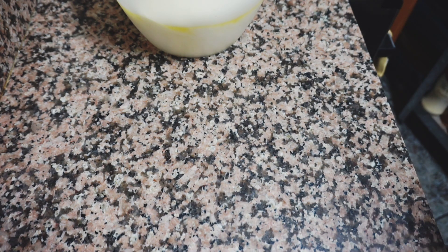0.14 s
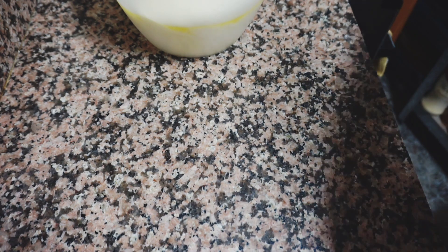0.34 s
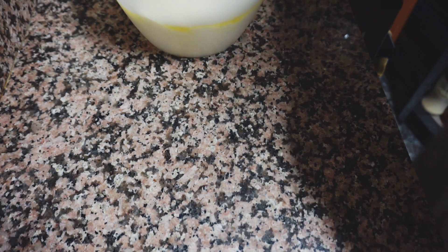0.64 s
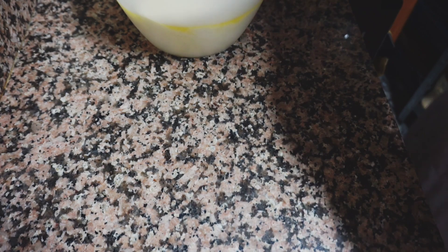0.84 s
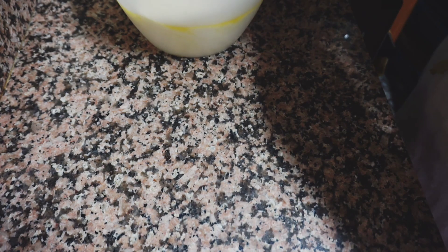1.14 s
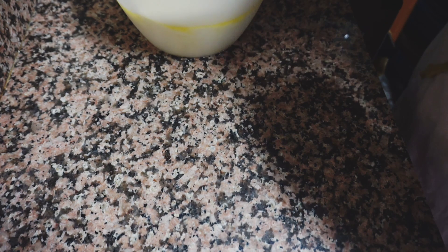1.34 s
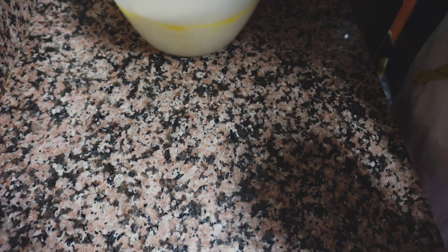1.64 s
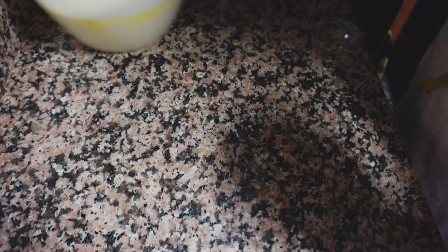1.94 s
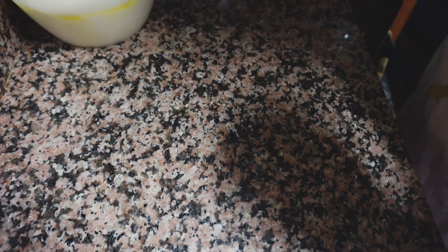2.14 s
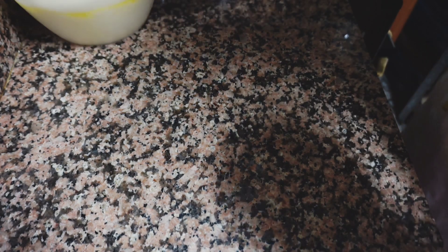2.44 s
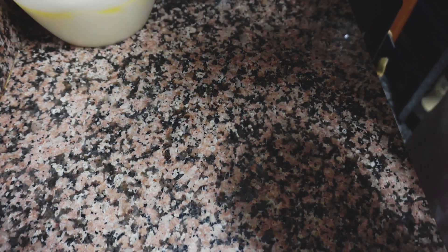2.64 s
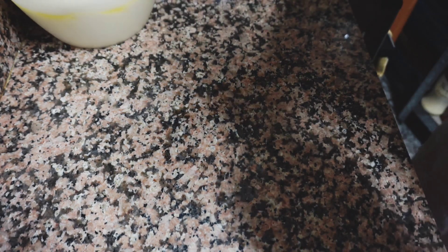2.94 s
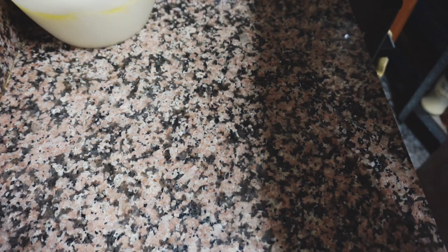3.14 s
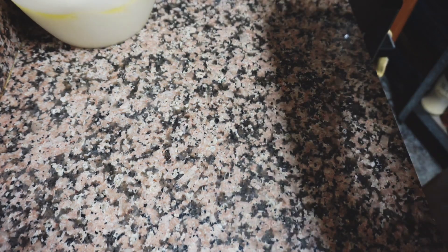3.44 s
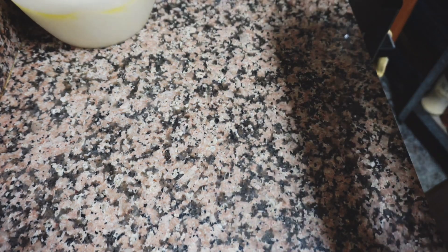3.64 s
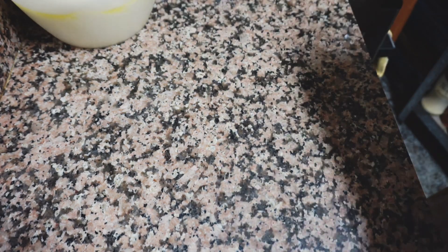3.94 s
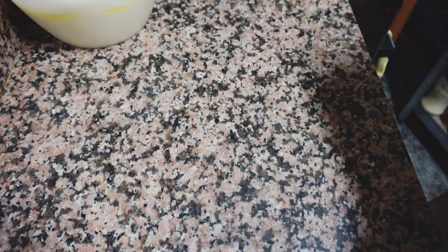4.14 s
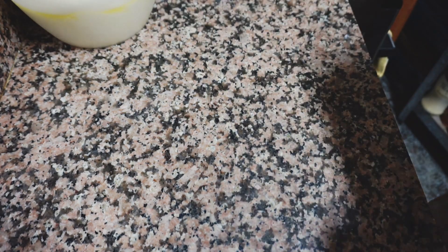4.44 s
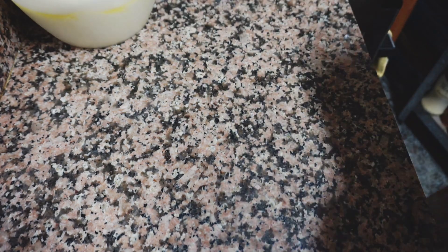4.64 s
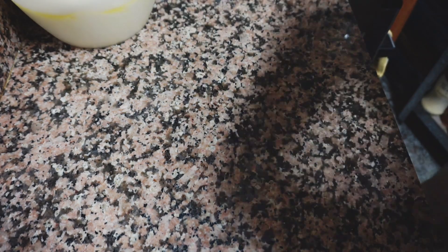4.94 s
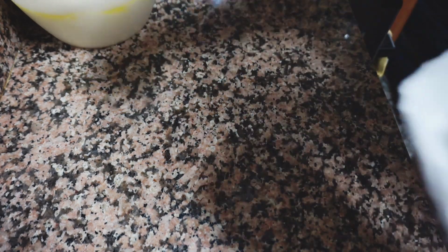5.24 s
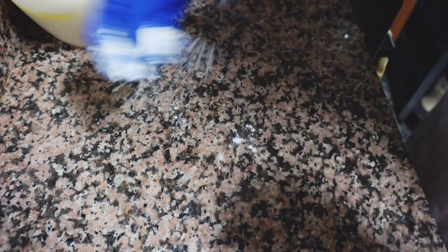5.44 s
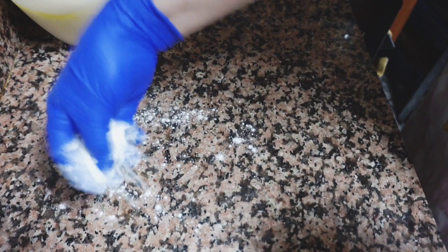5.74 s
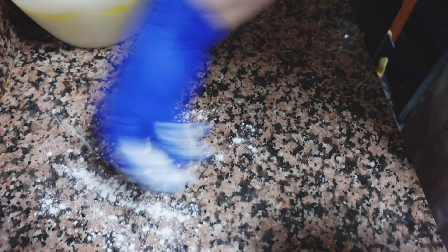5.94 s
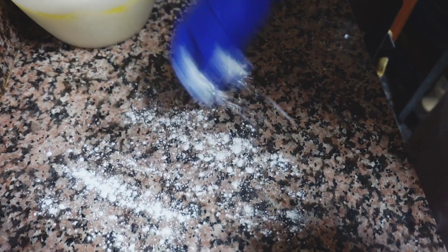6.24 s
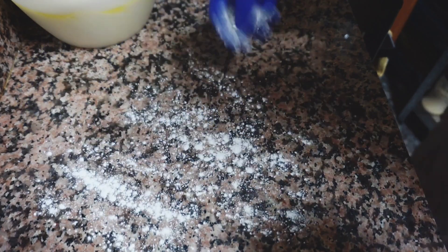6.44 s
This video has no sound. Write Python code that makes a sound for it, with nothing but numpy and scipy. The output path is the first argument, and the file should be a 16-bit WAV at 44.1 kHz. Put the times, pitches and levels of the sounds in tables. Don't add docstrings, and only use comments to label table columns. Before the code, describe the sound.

Close stereo pickup in a hard-walled kitchen. From the very start to about 1.4 s a gloved hand rummages in a flour bag: abrupt, dry crackles and papery snaps, densest and loudest around 0.7-1.2 s, with scratchy scraping and soft powdery hiss. From 1.5 to 2.1 s a plastic bowl is pushed over stone, a hollow, grating chatter that swells near 1.9 s with small catches; at 2.15 s it is knocked once, short and hard. A quicker, higher scrape follows at 2.4-2.65 s, then a barely audible slip. From about 3.0 to 5.1 s the bag rustles again in separate grabs and strokes, with sharp snaps near 3.26 and 4.8 s. Afterwards it is quiet: a faint clock ticks and tocks roughly every quarter second, soft dull taps come at 5.8-5.9 s, and faint air noise, fluctuating distant machine hum and a very high, thin whistle remain until 6.6 s.

```python
import sys
import numpy as np
from scipy import signal
from scipy.fft import rfft, irfft
from scipy.io import wavfile
from scipy.ndimage import uniform_filter1d

SR = 44100
rng = np.random.default_rng(int(sys.argv[2]) if len(sys.argv) > 2 else 0)


def linear_from_db(decibels):
    return 10 ** (np.asarray(decibels, float) / 20)


def bounce(signal):
    frames = np.transpose(np.atleast_2d(signal))
    limited = np.clip(frames, -1, 1)
    pcm = np.round(limited * 32767).astype(np.int16)
    wavfile.write(sys.argv[1], SR, pcm)


N = 290178
T = np.arange(N) / SR

# (time [s], peak level [dB], ring frequency [Hz], burst length [s])
BAG_CREASES = [(0.0005, -13, 1210, 0.0039), (0.01, -15.5, 1450, 0.004), (0.02, -19, 900, 0.0037),
               (0.0527, -20, 1490, 0.003), (0.1, -25.5, 700, 0.0044), (0.241, -21, 960, 0.004),
               (0.282, -28, 1200, 0.0022), (0.319, -27.5, 905, 0.004), (0.452, -31, 1880, 0.0066),
               (0.495, -39, 383, 0.01), (0.491, -15.5, 1500, 0.004), (0.516, -17.5, 1100, .003),
               (0.542, -22, 1000, 0.0038), (0.554, -12.5, 1390, 0.0035), (0.671, -26.5, 930, 0.013),
               (0.688, -13, 1180, 0.0024), (0.702, -13.5, 880, 0.0078), (0.708, -17, 1000, 0.0022),
               (0.714, -26, 790, 0.0042), (0.734, -19, 670, 0.0089), (0.741, -14.5, 860, 0.0032),
               (0.761, -9.5, 1090, 0.0028), (0.771, -20.5, 800, 0.0025), (0.783, -20, 850, 0.011),
               (0.818, -21.5, 1190, 0.004), (0.822, -14, 995, 0.003), (0.8295, -8, 950, 0.003),
               (0.863, -29, 899, 0.0048), (0.933, -18, 870, 0.0074), (1.003, -14.5, 1190, 0.0054),
               (1.059, -23, 890, 0.003), (1.068, -16, 1010, 0.0026), (1.073, -12.5, 1120, 0.003),
               (1.095, -13, 930, 0.0011), (1.097, -17, 700, 0.004), (1.116, -22.5, 426, 0.0063),
               (1.124, -18, 830, 0.011), (1.179, -25, 950, 0.0075), (1.146, -22, 620, 0.0052),
               (1.169, -21, 960, 0.003), (1.26, -17, 970, 0.0011), (1.269, -17.5, 785, 0.0031),
               (1.348, -22, 3250, 0.0036),
               (3.074, -30.5, 684, 0.01), (3.163, -23, 680, 0.0019), (3.215, -18, 646, 0.0087),
                (3.229, -16.5, 835, 0.0057), (3.244, -25, 535, 0.016), (3.26, -23.5, 573, 0.0065),
                (3.434, -22.5, 2160, 0.0085), (3.483, -18, 776, 0.0024), (3.507, -16.5, 824, 0.0031),
                (3.513, -17, 1020, 0.0035), (3.52, -15.5, 940, 0.0027), (3.525, -22, 960, 0.0017),
                (3.584, -23, 840, 0.027), (3.623, -21, 900, 0.0034), (3.629, -16.5, 1900, 0.004),
                (3.721, -28, 700, 0.003), (3.727, -19, 1150, 0.0092), (3.744, -18.5, 754, 0.0024),
                (3.758, -16.5, 805, 0.0042), (3.776, -25, 778, 0.0018), (3.787, -11.5, 1050, 0.005),
                (3.912, -20.5, 855, 0.013), (3.943, -17.5, 1020, 0.0049), (3.951, -19.5, 910, 0.003),
                (3.974, -18.5, 1290, 0.0073), (4.006, -14, 1040, 0.0025), (4.128, -24.5, 910, 0.0067),
                (4.253, -18.5, 1090, 0.0044), (4.273, -23, 786, 0.0061), (4.468, -26.5, 930, 0.0026),
                (4.536, -18.5, 1480, 0.0072), (4.795, -17, 1120, 0.0039), (4.802, -19, 905, .003),
                (4.837, -23.5, 620, 0.0051), (4.927, -24.5, 850, 0.0028), (5.045, -20.5, 1050, 0.0041)]
# (time [s], peak level [dB], ring frequency [Hz])
THIN_FOLDS = [(0.314, -19, 1920), (0.32, -25, 3900), (.784, -15.5, 3460), (1.297, -19, 3930),
              (1.353, -23, 3160), (1.345, -27, 2700), (1.357, -45, 3260), (1.305, -34, 3900),
              (1.315, -33, 4000), (3.027, -44.5, 656), (3.075, -31, 3700), (3.162, -29, 2670),
              (3.2612, -9, 2100), (3.507, -22, 1940), (4.0024, -21, 2100), (4.706, -42, 1460),
              (4.736, -32.5, 720), (4.8015, -10, 2420), (4.8364, -26, 3700), (4.99, -28.5, 516),
              (5.06, -35, 446), (5.085, -45, 323), (0.881, -36, 278), (1.129, -41, 2480), (4.5, -46, 800),
              (0.049, -16, 2610), (.7078, -23, 2750), (0.723, -7, 3730), (.738, -14, 2500),
              (.822, -9.5, 3470), (1.0595, -24, 2920), (1.068, -18, 2850), (1.1263, -13, 2390),
              (1.158, -19, 3700), (1.182, -17, 3000), (3.513, -25.5, 3800), (3.526, -16, 2500),
              (3.5837, -21, 3000), (3.6239, -37, 2710), (4.4997, -21, 4560)]
# (frequency [Hz], width [Hz], level [dB])
BAG_RESONANCES = [(595, 61, 2.5), (778, 360, 8.5), (1050, 260, 3), (1480, 71, 11), (269, 110, -3.5)]
# (frequency [Hz], level per Hz [dB])
SCRAPE_SPECTRUM = [(1200, 1.5), (1700, 2.5), (2300, 6.5), (3000, 2), (4800, -1), (6000, -14), (8000, -11)]
FLOUR_SPECTRUM = [(3500, 0), (5500, -1), (7900, -0.5), (10000, 1), (13000, -1), (15500, -5), (17000, -47)]
# (start [s], hold [s], flour level [dB], grip on the wall over the flour [dB])
HAND_STROKES = [(0.191, 0.14, -43, -1.5), (0.32, 0.092, -52.5, 6), (0.467, 0.041, -37, -2.5),
                (0.62, 0.043, -40.5, -3.5), (1.165, 0.03, -35, 0.5), (1.224, 0.094, -41, -0.5),
                (1.392, 0.089, -64, -2.5), (2.98, 0.098, -67, -11), (3.224, 0.034, -32, -4.5),
                (3.398, 0.077, -42.5, 1), (3.59, 0.088, -38.5, 1), (3.683, 0.042, -38.5, -3.5),
                (3.852, 0.13, -31.5, -3.5), (4.099, 0.04, -48.5, 5), (4.195, 0.055, -45, 2.5),
                (4.302, 0.098, -45, 0), (4.468, 0.08, -43.5, 1.5), (4.671, 0.17, -39.5, -3),
                (4.873, 0.12, -33.5, -10), (5.014, 0.03, -34, -4)]
HAND_GRABS = [(0, 0.017, -42, 13.5), (.05, 0.016, -46.5, 14), (0.491, 0.017, -37.5, 6),
              (.55, 0.027, -40.5, 5.5), (.536, .003, -40, -4), (.61, .004, -37.5, -6),
              (.636, 0.011, -36, -3), (0.684, 0.008, -49.5, 21), (.707, 0.005, -36.5, 11.5),
              (0.725, .008, -46, 10), (.737, 0.0058, -41, 15), (0.7848, 0.0043, -38.5, 10.5),
              (0.822, 0.0063, -36, 7), (.86, 0.087, -53, 7), (0.934, 0.052, -40, 1),
              (1.001, 0.063, -45.5, 7), (1.06, 0.026, -50, 20.5), (1.09, .06, -53, 17.5),
              (1.341, 0.012, -56, 0), (3.072, 0.054, -43, -2.5), (3.164, 0.005, -46, 14.5),
              (3.485, 0.031, -40.5, 5), (3.505, 0.018, -31.5, 2), (3.623, 0.0043, -28, -8.5),
              (3.74, 0.099, -35, 0), (4.001, 0.024, -36, 3), (4.534, 0.056, -46.5, 0.5),
              (4.793, 0.073, -37.5, -2)]
STROKE_RISE_DB_S, GRAB_RISE_DB_S, FALL_DB_S = 270, 2990.5, 507
# (time [s], delay of the left port [samples], left minus right level [dB])
HAND_PLACE = [
    (0, 7, -2.5),
    (.4, -6, -3.5),
    (1.4, -6, -5),
    (1.5, -1, 2.5),
    (3, -1, 2.5),
    (3.02, 8, -3),
    (6.6, 8, -3.5),
]

# (time [s], level [dB])
FOOT_PRESSURE = [
    [(1.52, -71), (1.61, -54.5), (1.63, -49), (1.75, -40), (1.89, -36.5), (1.95, -39), (2.04, -44),
     (2.135, -48)],
    [(2.33, -78), (2.385, -62.5), (2.49, -45), (2.575, -42), (2.62, -53), (2.68, -66), (2.76, -73)],
    [(2.8, -93), (2.86, -85), (2.93, -87), (2.99, -129.5)],
]
RIM_LEVELS = [-7, 3, 19]
GRIT_LEVELS = [-57, -64, -64]
# (frequency [Hz], width [Hz], level [dB])
BOWL_RESONANCES = [(157.5, 9.3, -3.5), (339, 82, -4.5), (570, 40, 0.5), (670, 270, -1.5), (800, 39, -7)]
SLOW_RIM = [(1350, 1100, 20.5), (1810, 450, 18), (2100, 110, 22), (2280, 160, -5), (3700, 220, -9)]
QUICK_RIM = [(1120, 540, 4.5), (1910, 320, 9), (2170, 470, 14.5), (2720, 190, 11.5), (3430, 170, 15),
             (4160, 440, 7), (4800, 560, 2.5), (6000, 410, -0.5)]
# (time [s], hold [s], level [dB])
GRIT_SCUFFS = [
    (1.535, .01, -63),
    (1.563, 0.009, -59),
    (1.637, 0.011, -49),
    (1.698, .005, -56),
    (2.052, 0.0081, -58),
    (2.59, 0.013, -53.5),
    (2.93, 0.007, -60),
]
# (time [s], level [dB])
FOOT_CATCHES = [
    (1.701, -42),
    (1.749, -61),
    (1.819, -32),
    (1.874, -25),
    (1.889, -35),
    (1.904, -34),
    (1.953, -27.5),
    (2.047, -27.5),
    (2.577, -33),
]
# (time [s], level [dB])
KNOCK_CONTACTS = [
    (2.1442, -25.5),
    (2.1465, -23.5),
    (2.1478, -12),
    (2.151, -29),
]
# (frequency [Hz], level [dB], decay time T60 [s])
CATCH_MODES = [(574, -1.5, 0.05), (660, -3, 0.054), (830, 3.5, 0.052), (2000, 0, 0.0072)]
BOWL_MODES = [(620, -19, 0.008), (830, -5.5, 0.029), (1190, -3, 0.013), (2044, 3, 0.032), (2420, 8, 0.0057),
              (2610, 6, 0.0122), (3400, -12, 0.002)]

# (time [s], level [dB])
TICK_BEATS = [
    (1.5224, -45),
    (2.0552, -62),
    (5.253, -47.5),
    (5.7904, -54.5),
    (6.324, -52.5),
]
TOCK_BEATS = [
    (2.3266, -62),
    (2.8564, -60.5),
    (5.5243, -61.5),
    (6.0625, -62.5),
]
# (frequency [Hz], level [dB], decay time T60 [s])
TICK_MODES = [(4270, -12.5, 0.014), (4800, 1, 0.003), (5340, -3.5, 0.0012), (6100, -8.5, 0.0031),
              (7700, -8, .004), (10300, -9.5, 0.0037)]
TOCK_MODES = [(2120, -6, 0.027), (2800, -14, 0.003), (3900, 8.5, 0.002), (4850, 3, 0.0056),
              (5500, -15, .002), (7600, -4, 0.0017)]
# (time [s], level [dB])
FAR_TAPS = [
    (5.817, -60),
    (5.829, -59.5),
]
SETTLING = [
    (5.865, -66),
    (5.89, -62),
    (5.915, -62),
]
# (frequency [Hz], level [dB], decay time T60 [s])
TAPPED_MODES = [(532, -2.5, 0.14), (760, -6, 0.041), (1330, -1, 0.02), (2010, -4, 0.01)]
# (frequency [Hz], decay time T60 [s])
ROOM_DECAY = [(250, 0.38), (1000, 0.26), (3000, 0.2), (8000, 0.21), (14000, 0.13)]
# (frequency [Hz], level per Hz [dB])
AIR_SPECTRUM = [(20, -27.5), (75, -19), (157, -7.5), (340, -10.5), (520, -2), (2300, -9.5), (3000, -17),
                (16000, -20.5)]
# (time [s], level [dB])
MACHINE_SWELLS = [(1.45, -52.5), (2.3, -54), (2.75, -65), (3.02, -58), (5.15, -50.5), (5.316, -55.5),
                  (5.576, -68), (5.846, -55), (5.994, -51.5), (6.484, -59.5), (6.58, -84)]


def bag():
    folds, cracks = creases()
    crumple = linear_from_db(-2) * hand(0.99) * unit(body(grains(110, 0.93, 0.012, -32.5), BAG_RESONANCES))
    scrape = linear_from_db(1) * hand(0.79) * colour(grains(540, 2.67, 0.0029, 1.8), SCRAPE_SPECTRUM)
    hiss = hand(0) * colour(grains(1200, 3.87, 0.0058, -5.0), FLOUR_SPECTRUM)
    return crumple + folds + scrape, hiss + cracks


def creases():
    thin_length_s, push_share, softness = 0.00054, 0.9, 6.7
    wall_sum, crack_sum, t = np.zeros(N + SR), np.zeros(N + SR), T[:SR // 10]
    events = BAG_CREASES + [(*row, thin_length_s) for row in THIN_FOLDS]
    for s, db, hz, length_s in events:
        envelope = np.exp(-t / max(length_s, .001)) * np.minimum(t / 0.00052, 1)
        burst = rng.standard_normal((2, len(t))) * envelope
        burst[0] += push_share * np.sin(np.pi * np.clip(2 * hz * (t - .001), 0, 1))
        wall = body(burst[0], [(hz, .3 * hz, 0), (1.7 * hz, .8 * hz, -6 - hz / 200)])
        wall = signal.lfilter(*signal.butter(1, min(softness * hz, 15000), fs=SR), wall)
        crack = body(burst[1], [(2800, 1500, 15.5), (9050, 11000, -28.5)])
        crack_db = -52 + 17 * np.log2(hz / 1000)
        start = int(s * SR)
        wall_sum[start:][:len(t)] += linear_from_db(db) * wall / np.abs(wall).max()
        crack_sum[start:][:len(t)] += linear_from_db(db + crack_db) * crack / np.abs(crack).max()
    return wall_sum[:N], crack_sum[:N]


def hand(share):
    levels = []
    for moves, rise_db_s in [(HAND_STROKES, STROKE_RISE_DB_S), (HAND_GRABS, GRAB_RISE_DB_S)]:
        s, hold_s, db, grip_db = np.transpose(moves)
        levels.append(swell(s, hold_s, db + share * grip_db, rise_db_s))
    return np.hypot(*levels)


def bowl():
    db, = curves(FOOT_PRESSURE)
    push = np.searchsorted([p[0][0] - .03 for p in FOOT_PRESSURE[1:]], T)
    moving = np.clip((db + 110) / 15, 0, 1)
    chatter = grains(720, 0.69, 0.0011, -11)
    rim = np.where(push == 0, steep(chatter, SLOW_RIM), steep(chatter, QUICK_RIM))
    rim = moving * linear_from_db(np.take(RIM_LEVELS, push)) * rim
    foot = steep(chatter, [(hz, 1.58 * width, peak_db) for hz, width, peak_db in BOWL_RESONANCES])
    top_db = np.array([np.max(np.array(p)[:, 1]) for p in FOOT_PRESSURE])[push]
    grit_level = moving * linear_from_db(np.take(GRIT_LEVELS, push) + 0.18 * (db - top_db))
    grit_level = grit_level + swell(*np.transpose(GRIT_SCUFFS), 700)
    grit = colour(grains(1400, 3.8, 0.0037, -3.0), [(2500, 0), (4500, 1.5), (9000, -2.0), (16000, -4.0)])
    slide = linear_from_db(db) * (foot + rim) + grit_level * grit
    catches = linear_from_db(-5.0) * uniform_filter1d(strike(FOOT_CATCHES, CATCH_MODES), size=14)
    return slide + knock() + catches


def knock():
    first_s, hardest_s = KNOCK_CONTACTS[0][0], KNOCK_CONTACTS[2][0]
    envelope = np.exp(-np.abs(T - hardest_s) / np.where(T < hardest_s, .002, .006))
    envelope = (T - first_s > 0) * envelope
    noise = colour(rng.standard_normal(N), [(1500, 1), (3000, 4), (7000, -9.0), (13000, -16.0), (16000, -12)])
    ringing = uniform_filter1d(strike(KNOCK_CONTACTS, BOWL_MODES), size=4)
    return linear_from_db(-8.5) * ringing + linear_from_db(-25.5) * envelope * noise


def clock():
    beats = linear_from_db(4.5) * strike(TICK_BEATS, TICK_MODES) + linear_from_db(7) * strike(TOCK_BEATS, TOCK_MODES)
    t = T[:SR // 3]
    far_walls = rng.standard_normal(len(t)) * 1000 ** (-t / 0.39)
    return beats + linear_from_db(-38) * signal.fftconvolve(beats, far_walls)[:N]


def far_taps():
    return strike(FAR_TAPS, TAPPED_MODES) + strike(SETTLING, TAPPED_MODES[:1])


def rumble():
    effort = uniform_filter1d(hand(0.97), SR // 24) + linear_from_db(-75.0)
    effort = effort + linear_from_db(curves(FOOT_PRESSURE)[0] - 6)
    effort = effort + swell([2.143], [.01], [-30], 3030)
    low_spectrum = [(20, -3.5), (60, -9.5), (110, -1.0), (170, 9.0), (260, -14.5)]  # (Hz, dB per Hz)
    return linear_from_db(-33.0) * effort * colour(grains(260, 0.87, .01, -19.0), low_spectrum)


def air():
    still = linear_from_db(-69) * colour(rng.standard_normal((2, N)), AIR_SPECTRUM)
    machine_peaks = [(600, 160, -4.5), (1330, 160, -2), (1910, 200, -9.5), (2370, 64, -5.5)]  # (Hz, width, dB)
    machine = unit(body(rng.standard_normal((2, N)), machine_peaks))
    both = still + linear_from_db(np.interp(T, *np.transpose(MACHINE_SWELLS)) - 14.5) * machine
    whistle = linear_from_db(-75) * np.sqrt(2) * np.sin(2 * np.pi * 15625 * T)
    return spread(*both) * linear_from_db([[-1.1], [1.1]]) + whistle


def walls(x):
    t, (hz, t60) = T[:SR // 2], np.transpose(ROOM_DECAY)
    edges = np.r_[40, np.sqrt(hz[1:] * hz[:-1]), 20000]
    tail = 0
    for low, high, decay_s in zip(edges, edges[1:], t60):
        band = signal.butter(2, (low, high), "band", fs=SR, output="sos")
        tail = tail + signal.sosfilt(band, rng.standard_normal((2, len(t)))) * 1000 ** (-t / decay_s)
    tail = tail * np.minimum(t / 0.0023, 1)
    return signal.fftconvolve(x[None], tail / np.sqrt(np.sum(tail ** 2) / 2), axes=1)[:, :N]


def spread(a, b):
    side = signal.lfilter(*signal.butter(1, 700, "high", fs=SR), b)
    return np.array([a + side, a - side])


def grains(rate, spread_db, smear_s, side_db):
    jumps = linear_from_db(spread_db * np.minimum(rng.exponential(size=N), 4.5))
    kicks = (rng.random(N) < rate / SR) * jumps
    mid, side = rng.standard_normal((2, N))
    power = signal.lfilter([1], [1, -np.exp(-1 / (smear_s * SR))], kicks ** 2)
    return np.sqrt(power + 1e-9) * (mid + linear_from_db(side_db) * side * np.array([[1], [-1]]))


def strike(hits, modes):
    x = np.zeros(N)
    for s, db in hits:
        x[int(s * SR)] = linear_from_db(db)
    return signal.fftconvolve(x, ring(modes))[:N]


def ring(modes):
    t = T[:SR // 4]
    return sum(linear_from_db(db) * np.sin(2 * np.pi * hz * t) * 1000 ** (-t / t60) for hz, db, t60 in modes)


def body(x, peaks):
    return sum(linear_from_db(db) * signal.lfilter(*signal.iirpeak(hz, hz / width, SR), x) for hz, width, db in peaks)


def steep(x, peaks):
    return unit(sum(body(body(x, [(hz, width, 0)]), [(hz, width, db)]) for hz, width, db in peaks))


def colour(x, points):
    hz, db = np.transpose(points)
    size = x.shape[-1]
    f = np.arange(size // 2 + 1) * SR / size + 1
    gain = linear_from_db(np.interp(np.log(f), np.log(hz), db, -140, -140))
    return unit(irfft(rfft(x) * gain, size))


def swell(s, hold_s, db, rise_db_s):
    s, hold_s, db = (np.asarray(v)[:, None] for v in (s, hold_s, db))
    t = T[::64]
    each = db - rise_db_s * np.maximum(s - t, 0) - FALL_DB_S * np.maximum(t - s - hold_s, 0)
    return np.interp(T, t, np.sqrt(np.sum(linear_from_db(2 * each), axis=0)))


def curves(tables):
    rows = np.vstack([np.vstack([t[0], t, t[-1]]) for t in map(np.array, tables)])
    ends = np.cumsum([len(t) + 2 for t in tables])
    firsts, lasts = np.r_[0, ends[:-1]], ends - 1
    rows[firsts, 0] -= .02
    rows[lasts, 0] += .02
    rows[np.r_[firsts, lasts], 1] = -110
    return [np.interp(T, rows[:, 0], c) for c in rows[:, 1:].T]


def unit(x):
    return x / np.sqrt(np.mean(x ** 2))


def scene():
    rustle, hiss = bag()
    near, ticks, taps = rustle + bowl(), clock(), far_taps()
    s, lag, pan_db = np.transpose(HAND_PLACE)
    late = np.arange(N) - np.round(np.interp(T, s, lag)).astype(int)
    late = np.clip(late, 0, N - 1)
    pan = linear_from_db(np.interp(T, s, pan_db) * np.array([[.5], [-.5]]))
    direct = (np.array([near[0, late], near[1]]) + hiss) * pan
    room = walls(linear_from_db(-9.0) * (near + hiss)[0] + linear_from_db(4.0) * ticks + taps)
    sources = linear_from_db(-0.5) * direct + linear_from_db(-2) * ticks + linear_from_db(9.5) * taps + spread(*room)
    radiated = signal.sosfilt(signal.butter(3, 260, "high", fs=SR, output="sos"), sources)
    return radiated + rumble() + air()


def low_pass(x):
    return signal.sosfilt(signal.butter(12, 15930, fs=SR, output="sos"), x)


def record(dry):
    mix = signal.sosfilt(signal.ellip(6, .2, 40, 15900, fs=SR, output="sos"), dry)
    return low_pass(mix)


dry = scene()
out = record(dry)
bounce(out)
```